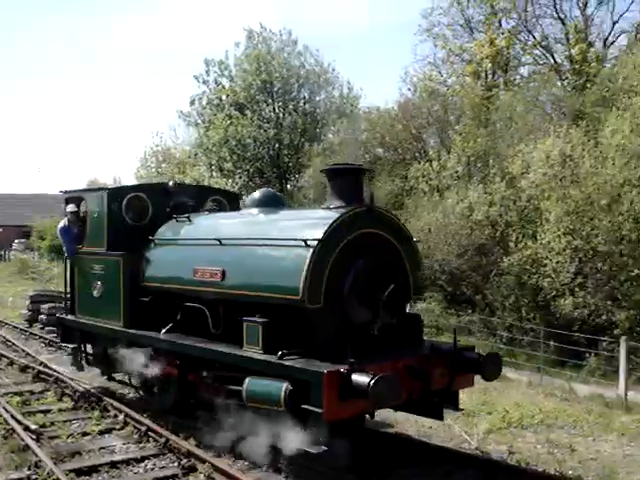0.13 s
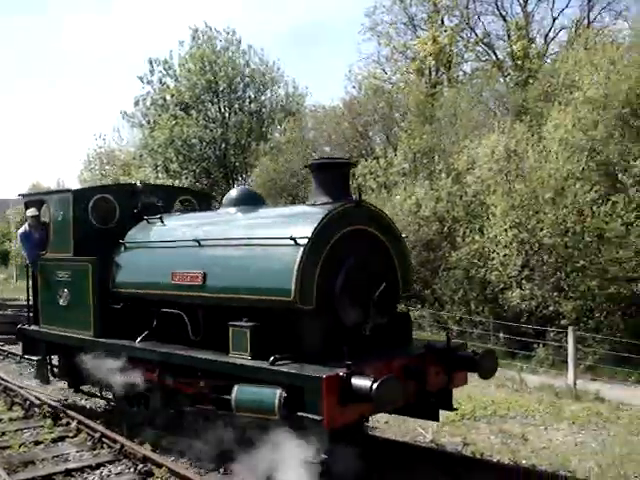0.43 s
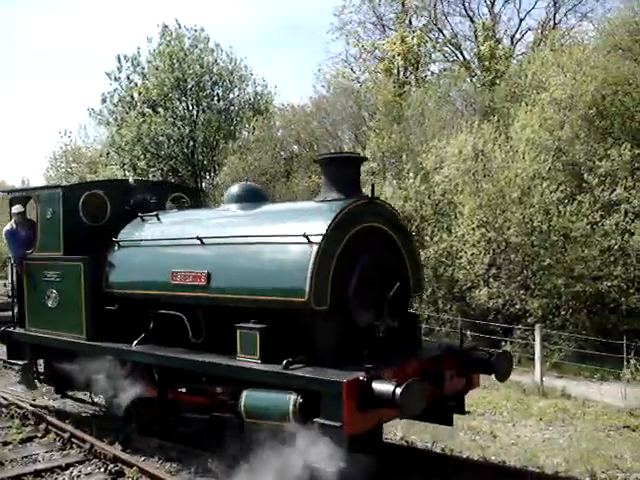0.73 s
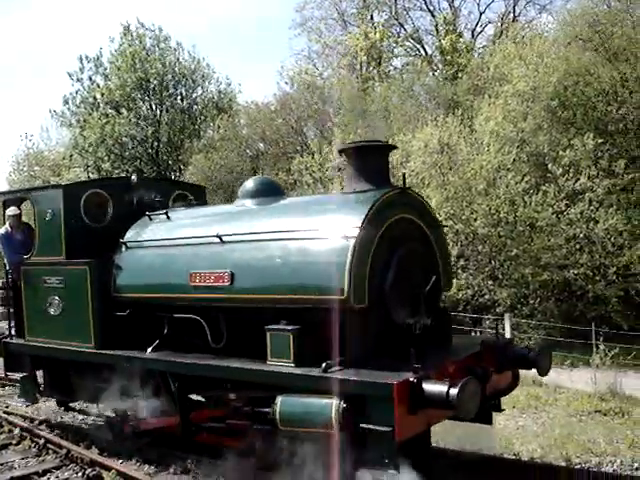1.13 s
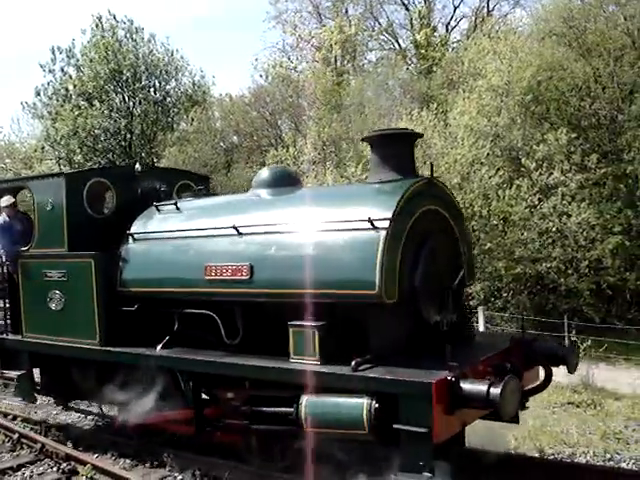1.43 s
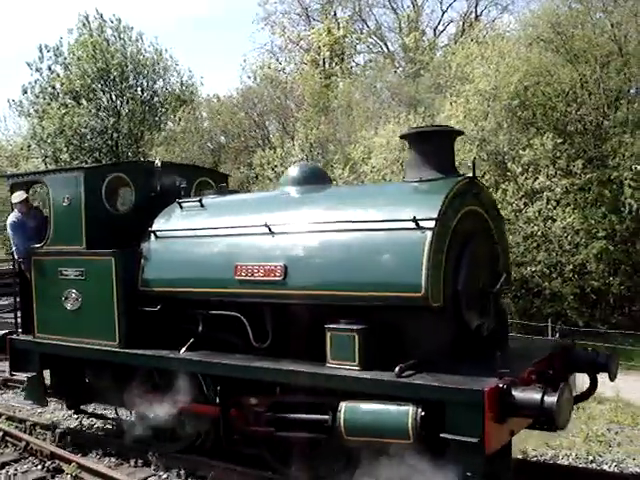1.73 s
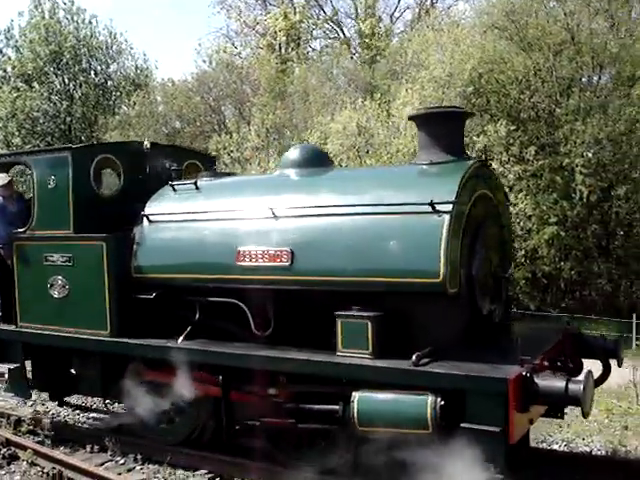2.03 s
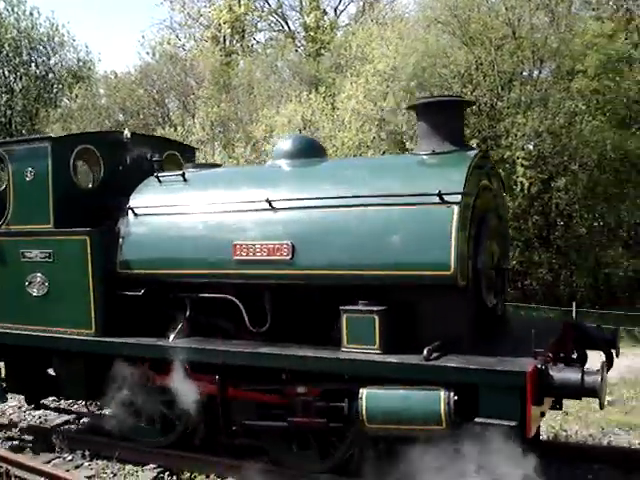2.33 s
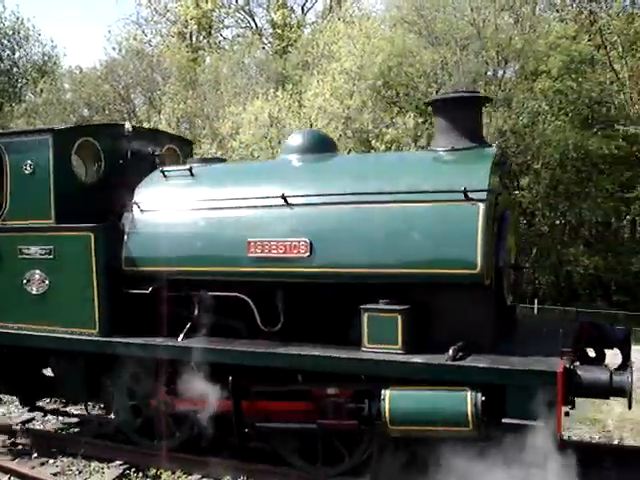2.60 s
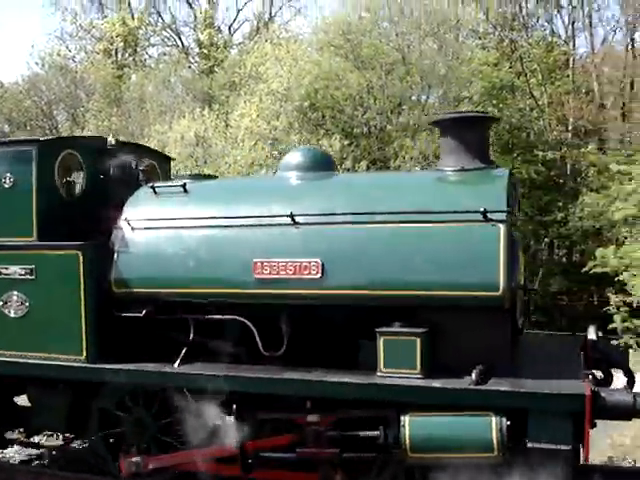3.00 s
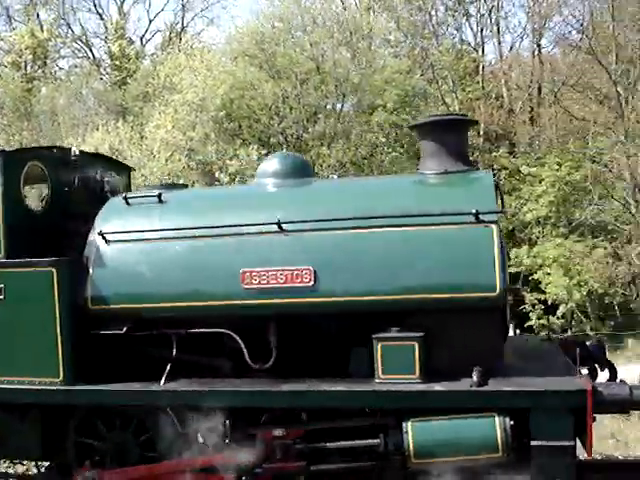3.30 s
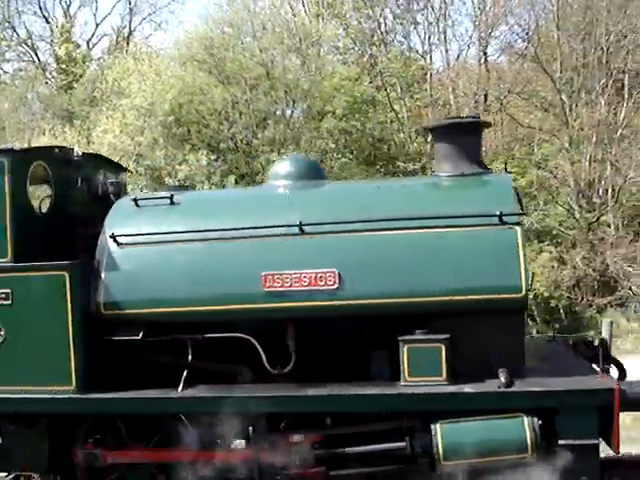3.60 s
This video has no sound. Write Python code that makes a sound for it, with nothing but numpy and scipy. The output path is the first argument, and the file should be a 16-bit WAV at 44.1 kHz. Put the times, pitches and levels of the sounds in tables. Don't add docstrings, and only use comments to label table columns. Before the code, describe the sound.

A small steam locomotive rolls by outdoors, its steam jets hissing brightly and continuously for about four seconds, with brief breathy whistles. Wheels rumble low with a wavering drone. A hard metal knock lands at 0.1 s, a faint thin flange squeal at 0.7-1.0 s, scattered rod knocks from 1.05 s, denser after 2.7 s, and a heavy ringing coupling clank at 3.7 s. Close, nearly mono, coarse treble.

```python
import sys
import numpy as np
from scipy import signal
from scipy.io import wavfile

SR = 44100
rng = np.random.default_rng(int(sys.argv[2]) if len(sys.argv) > 2 else 0)


def voltage_ratio(decibels):
    exponent = np.asarray(decibels, float) / 20
    return 10 ** exponent


def waveform_to_disk(signal):
    frames = np.transpose(np.atleast_2d(signal))
    scaled = np.clip(frames, -1, 1) * 32767
    samples = np.round(scaled).astype(np.int16)
    wavfile.write(sys.argv[1], SR, samples)


N = 165375


def rms_one(x):
    return x / np.sqrt(np.mean(x ** 2) + 1e-20)


def in_time(rows):
    s, *columns = np.transpose(rows)
    return [np.interp(np.arange(N) / SR, s, column) for column in columns]


def drift(rate_hz):
    r = np.exp(-80 * np.pi * rate_hz / SR)
    slow = signal.lfilter([1], [1, -2 * r, r * r], rng.standard_normal(N // 40 + 2002))[2000:]
    return np.interp(np.arange(N) / 40, np.arange(len(slow)), rms_one(slow - slow.mean()))


def high_pass(x, order, hz):
    return signal.sosfilt(signal.butter(order, hz, "high", fs=SR, output="sos"), x)


def resonance(x, hz, width_hz):
    r = np.exp(-np.pi * width_hz / SR)
    a = [1, -2 * r * np.cos(2 * np.pi * hz / SR), r * r]
    once = signal.lfilter([1, 0, -1], a, x)
    return signal.lfilter([1, 0, -1], a, once)


def ring(x, hz, t60_s):
    r = voltage_ratio(-60 / (t60_s * SR))
    w = 2 * np.pi * hz / SR
    return signal.lfilter([0, np.sin(w)], [1, -2 * r * np.cos(w), r * r], x)


def banded_noise(spectrum, span_hz, count, patch_db, flicker_db, tilt_db, sputter_db):
    hz, db = np.transpose(spectrum)
    edges = np.geomspace(*span_hz, count + 1)
    white = rng.standard_normal((2, N + SR))
    out = 0
    for k, (low, high) in enumerate(zip(edges, edges[1:])):
        sos = signal.butter(2, [low, high], "band", fs=SR, output="sos")
        band = signal.sosfilt(sos, white[k % 2])[SR:]
        mid = np.sqrt(low * high)
        level = np.interp(np.log(mid), np.log(hz), db) + tilt_db * np.log2(mid / edges[count // 2])
        level = level + patch_db * drift(3.46) + flicker_db * drift(25)
        level = level + sputter_db * np.log2(mid / edges[0]) * drift(120)
        out = out + band * voltage_ratio(level)
    return rms_one(out)


def rolling():
    # start_s [s], rumble_db [dB], drone_db [dB]
    load = [(0.0, -35, -32), (0.09, -34, -30), (0.21, -39, -59), (0.25, -42, -32), (0.28, -42.5, -46.5),
            (1.01, -38, -31), (1.21, -38.5, -46), (1.67, -35.5, -32), (2.21, -42, -44), (2.7, -37.5, -37),
            (2.74, -40.5, -46), (3.22, -39, -33.5), (3.25, -40, -43), (3.49, -37, -23), (3.72, -35.5, -37),
            (3.75, -33.5, -41)]
    # pitch_hz [Hz], level_db [dB per Hz]
    roll_colour = [(15, -52), (25, -22), (91, -24.5), (185, 0), (373, -7.5), (553, -4.5), (880, -6),
                   (1560, -3.5), (1800, -6), (2340, -35), (3960, -120)]
    rumble_db, drone_db = in_time(load)
    rumble = banded_noise(roll_colour, (22, 2300), count=20, patch_db=1.63, flicker_db=1.6,
                          tilt_db=-1.5, sputter_db=0)
    drone = resonance(rng.standard_normal(N + SR), hz=184.8, width_hz=20.6)
    drone = rms_one(drone[SR:])
    return rumble * voltage_ratio(rumble_db + 3) + drone * voltage_ratio(drone_db - 7)


def squeal():
    # start_s [s], pitch_hz [Hz], level_db [dB]
    squeal_path = [
        (.69, 830, -65),
        (.725, 845, -35),
        (.75, 810, -55),
        (.775, 795, -37),
        (.805, 865, -45),
        (.9, 820, -48),
        (1.0, 785, -48),
        (1.05, 775, -68),
    ]
    hz, db = in_time(squeal_path)
    level = np.sqrt(2) * voltage_ratio(db + .7 * drift(30))
    wavering_hz = hz + 2.1 * drift(27)
    return level * np.sin(2 * np.pi * np.cumsum(wavering_hz) / SR)


def struck(contact, hz, t60_s, db):
    tone = ring(contact, hz, t60_s)
    return voltage_ratio(db) * tone / np.abs(tone).max()


def knocks():
    # start_s [s], level_db [dB peak], pitch_hz [Hz], contact_s [s], overtones_db [dB]
    blows = [(.015, -28.5, 880, .02, -12), (0.104, -13, 744, 0.01, -3), (.16, -25, 1185, 0.078, -9),
             (1.055, -21.5, 613, 0.05, -1), (1.15, -29, 580, 0.014, -5), (1.46, -27, 456, 0.1, -11),
             (1.622, -27.5, 598, 0.064, -22), (1.816, -22.5, 1170, .012, -15), (1.82, -24, 628, 0.028, -5),
             (1.955, -29, 1206, 0.017, -17), (2.666, -24, 945, 0.033, -8), (2.915, -21, 740, 0.019, -2),
             (3.062, -19, 660, 0.037, -4), (3.44, -20.5, 780, .03, -5), (3.505, -25, 750, 0.013, -6),
             (3.56, -25.5, 960, 0.036, -13), (3.63, -23, 1166, .02, -10), (3.71, -11.5, 635, 0.031, -4)]
    # ratio [times main pitch], level_db [dB], t60_s [s]
    iron = [
        (1, -3, .06),
        (.6, -5, .05),
        (.8, -4, .05),
        (1.2, -4, .05),
        (1.42, -6, .06),
        (1.75, -11, .04),
    ]
    first_blow = .45
    out = np.zeros(N + SR)
    t = np.arange(SR // 2) / SR
    for s, db, hz, length, over_db in blows:
        grit = rng.standard_normal((len(iron) + 1, len(t)))
        touch_db = rng.normal(0, 0.61, len(iron))
        click = first_blow * np.sqrt(length * SR) * (t == 0)
        contact = grit * np.minimum(t / 0.0028, 1) * np.exp(-t / length) + click
        hit = 0
        for k, (ratio, level, t60_s) in enumerate(iron):
            ring_db = level + touch_db[k] + over_db * (k > 0)
            hit = hit + struck(contact[k], hz * ratio, t60_s, ring_db)
        if s == blows[-1][0]:
            hit = hit + struck(contact[-1], hz=1490, t60_s=.14, db=-2.5)
        start = int(s * SR)
        out[start:start + len(t)] += voltage_ratio(db) * hit / np.abs(hit).max()
    return high_pass(out[:N], 2, 320)


def whistles():
    # start_s [s], length_s [s], pitch_hz [Hz], level_db [dB]
    edge_tones = [(0.04, 0.24, 2410, -25), (.2, 0.18, 4580, -24.5), (0.761, 0.2, 3310, -27.5),
                  (0.768, 0.14, 4300, -25), (1.552, 0.14, 3520, -25.5), (1.76, 0.15, 2720, -29),
                  (1.874, 0.24, 2290, -30.5), (1.266, .1, 3840, -26), (2.72, 0.18, 4240, -28),
                  (3.007, 0.37, 3610, -24), (2.9, 0.45, 4400, -25.5), (3.27, 0.22, 5870, -30),
                  (3.6, 0.17, 4820, -26)]
    out = np.zeros(N)
    t = np.arange(N) / SR
    for s, length, hz, db in edge_tones:
        swell = np.sin(np.pi * np.clip((t - s) / length, 0, 1))
        breath = resonance(rng.standard_normal(N), hz, width_hz=390)
        out += voltage_ratio(db) * swell * rms_one(breath)
    return out


def jets():
    # start_s [s], level_db [dB]
    flow = [(0.0, -20.5), (0.16, -18.5), (0.7, -20.5), (0.87, -20), (0.99, -21.5), (1.54, -20.5),
            (1.64, -19), (1.7, -20.5), (2.44, -20), (2.47, -22.5), (2.68, -21.5), (2.71, -18.5),
            (2.79, -20), (3.15, -19.5), (3.34, -21.5), (3.5, -19), (3.57, -22), (3.75, -19)]
    # pitch_hz [Hz], level_db [dB per Hz]
    jet_colour = [(1000, -50), (1700, -13), (1840, -2), (2120, -6.5), (2670, -1), (3610, 0), (6040, -4.5),
                  (9900, -17.5), (12900, -40), (21800, -120)]
    flow_db, = in_time(flow)
    brighter_db = 0.022 * (flow_db - flow_db.mean())
    hiss = banded_noise(jet_colour, (1550, 10600), count=30, patch_db=1.56, flicker_db=0.2,
                        tilt_db=brighter_db, sputter_db=-0.47)
    hiss = high_pass(hiss, 4, 1750)
    return hiss * voltage_ratio(flow_db + 0.65 + 0.26 * drift(20))


def scene():
    mono = rolling() + squeal() + knocks() + whistles() + jets()
    return np.tile(mono, (2, 1))


def camera_steps(x):
    m, frame = 44, 36
    size = 16 * m
    dead_zone = .42
    coarse_share = .85
    f = np.linspace(0, 1, 33)
    low = signal.firwin2(size, np.r_[f / m, 1], np.r_[np.cos(np.pi * f / 2), 0], window=("kaiser", 3))
    n = np.arange(size) - (size - 1) / 2
    k = np.arange(10, 20)[:, None]
    bank = 2 * np.sqrt(m) * low * np.cos((k + .5) * np.pi * n / m + (-1) ** k * np.pi / 4)
    steps = (N // (m * frame) + 2) * frame
    padded = np.r_[np.zeros(size), x, np.zeros(steps * m - N)]
    windows = np.lib.stride_tricks.sliding_window_view(padded, size)[::m][:steps]
    bands = (windows @ bank.T).reshape(-1, frame, len(k))
    edge = dead_zone * np.abs(bands).max(axis=1, keepdims=True)
    kept = np.sign(bands) * (np.abs(bands) > edge)
    power = np.mean(bands ** 2, axis=1, keepdims=True)
    kept = kept * np.sqrt(power / (np.mean(kept ** 2, axis=1, keepdims=True) + 1e-9))
    coarse = rng.random((len(bands), 1, len(k))) < coarse_share
    error = ((kept - bands) * coarse).reshape(steps, -1) @ bank
    out = np.r_[padded, np.zeros(size)]
    for i in range(size // m):
        out[i * m:(i + steps) * m] += error[:, i * m:(i + 1) * m].ravel()
    return out[size:size + N]


def split_ears(mono):
    # start_s [s], length_s [s], low_hz [Hz], high_hz [Hz]
    split_bands = [
        (.44, .046, 4150, 7600),
        (.51, .046, 4650, 5700),
        (1.0, .046, 8300, 9600),
        (1.025, .07, 5150, 6300),
        (1.045, .046, 6300, 6900),
        (1.07, .046, 6300, 7600),
        (1.557, .046, 8300, 9650),
        (2.253, .046, 4650, 5700),
        (2.485, .046, 6300, 7600),
    ]
    side = np.zeros(N)
    t = np.arange(N) / SR
    for s, length, low, high in split_bands:
        sos = signal.butter(6, [low, high], "band", fs=SR, output="sos")
        gate = np.sin(np.pi * np.clip((t - s) / length, 0, 1))
        level = np.sqrt(np.sum((gate * signal.sosfilt(sos, mono)) ** 2) / np.sum(gate ** 2))
        noise = rms_one(signal.sosfilt(sos, rng.standard_normal(N)))
        side += 0.59 * level * gate * noise
    return mono + side * np.array([[1], [-1]])


def low_pass(x):
    return signal.sosfilt(signal.butter(12, 10570, fs=SR, output="sos"), x)


def record(dry):
    top_cut = signal.ellip(14, .5, 90, 10030, fs=SR, output="sos")
    mono = signal.sosfilt(top_cut, camera_steps(dry[0]))
    return low_pass(split_ears(mono))


dry = scene()
out = record(dry)
waveform_to_disk(out)
```